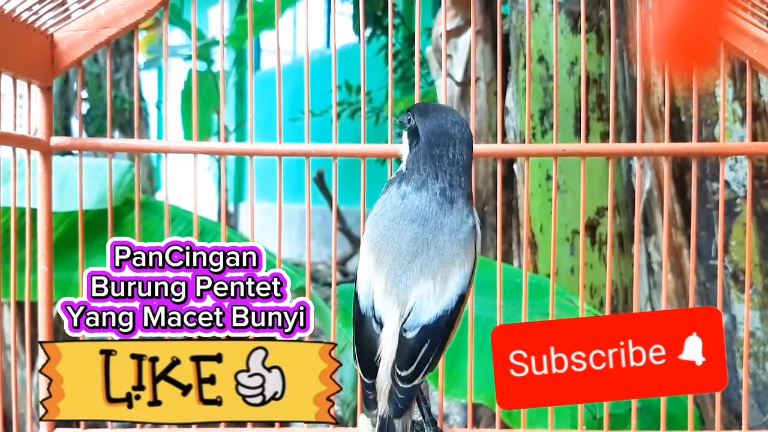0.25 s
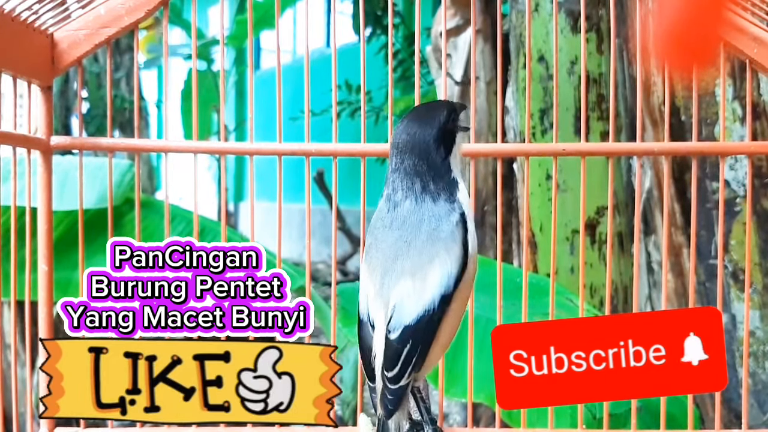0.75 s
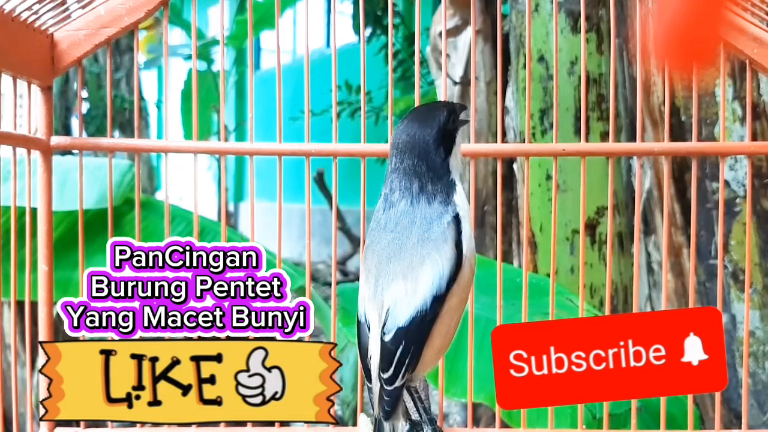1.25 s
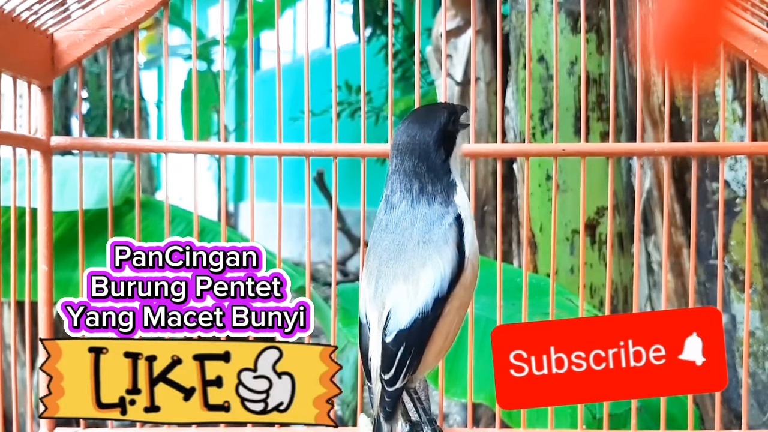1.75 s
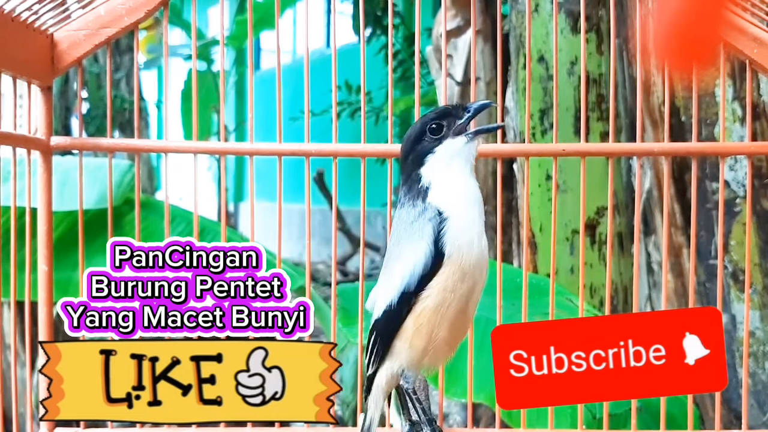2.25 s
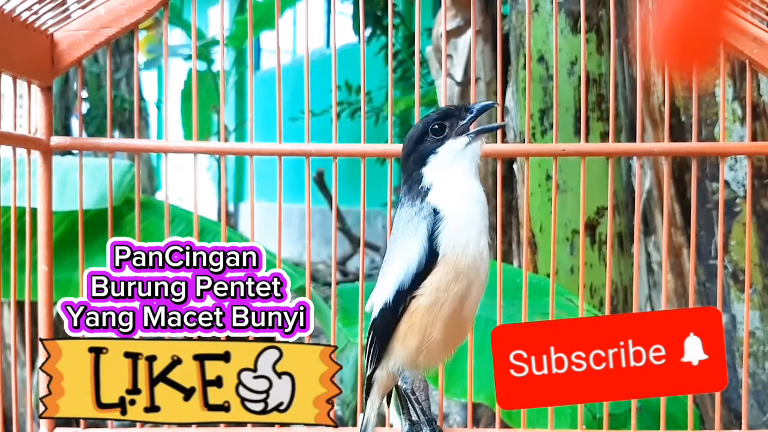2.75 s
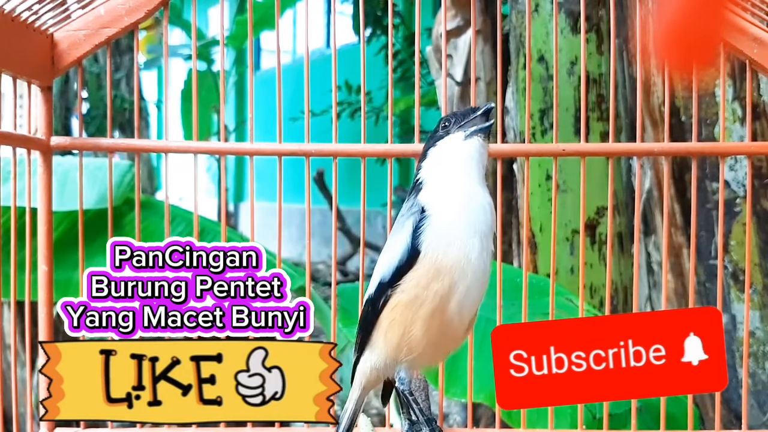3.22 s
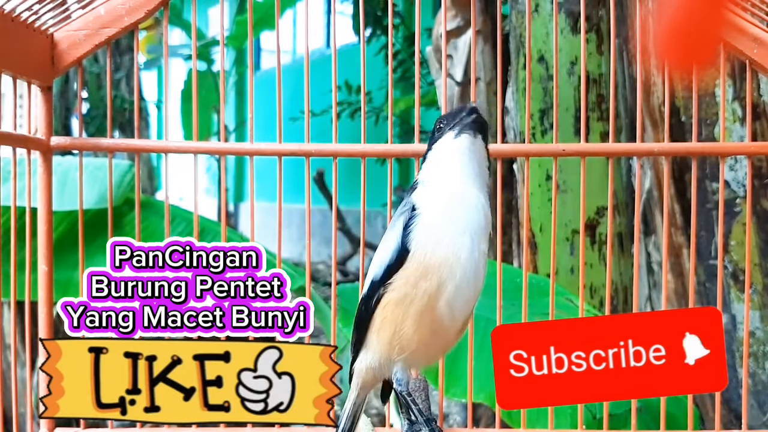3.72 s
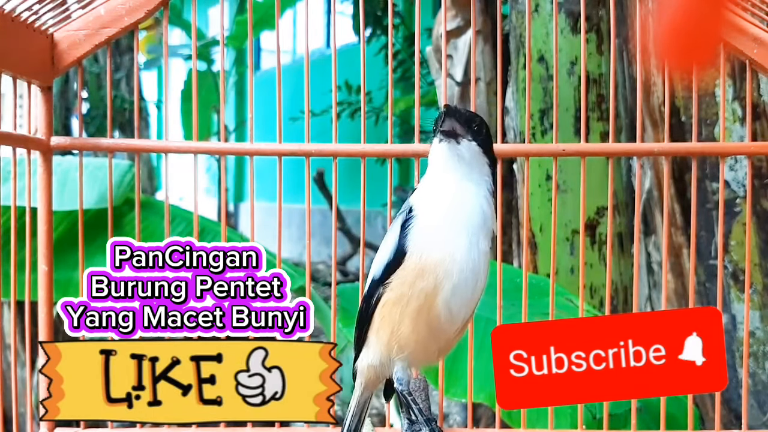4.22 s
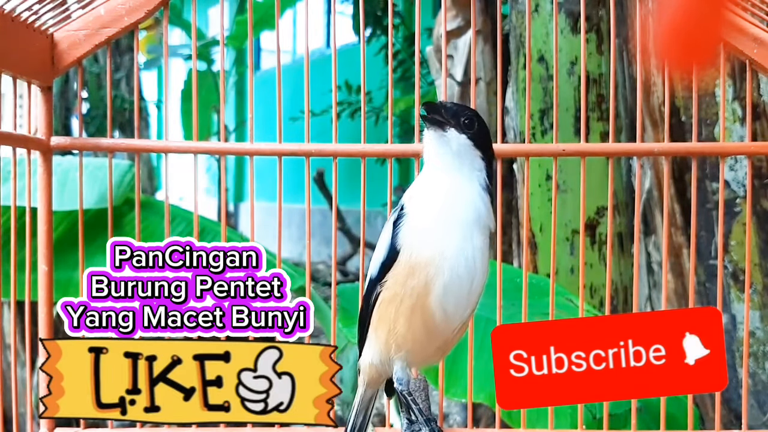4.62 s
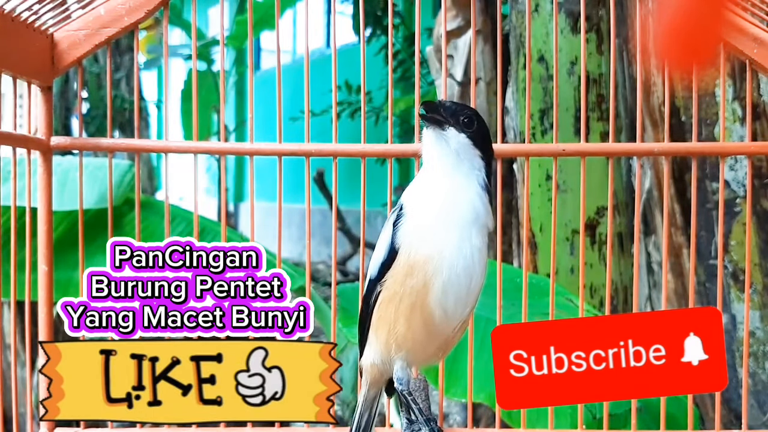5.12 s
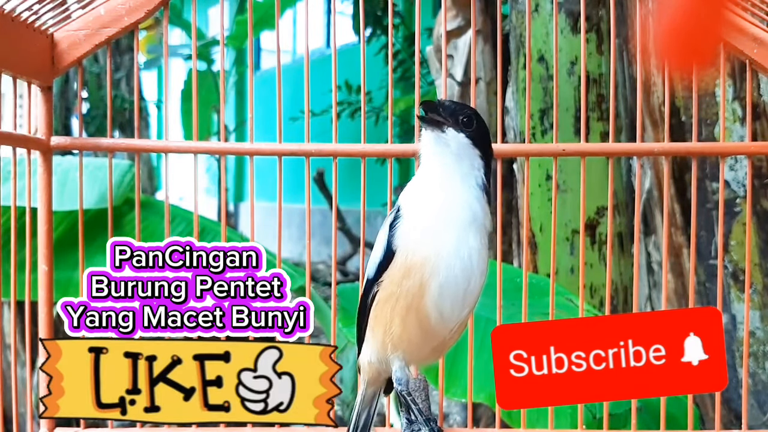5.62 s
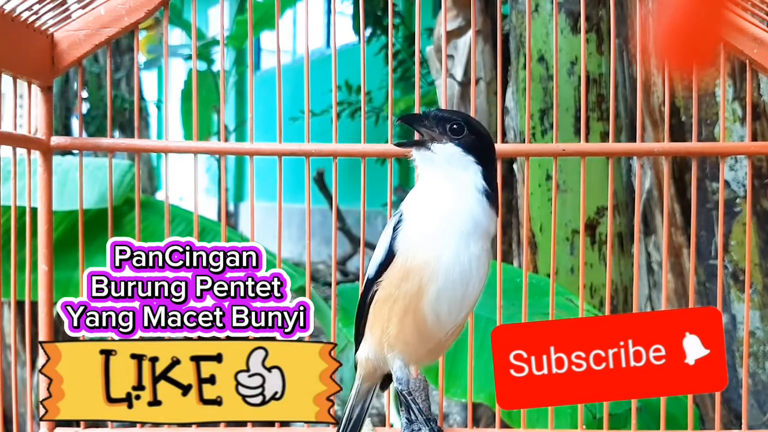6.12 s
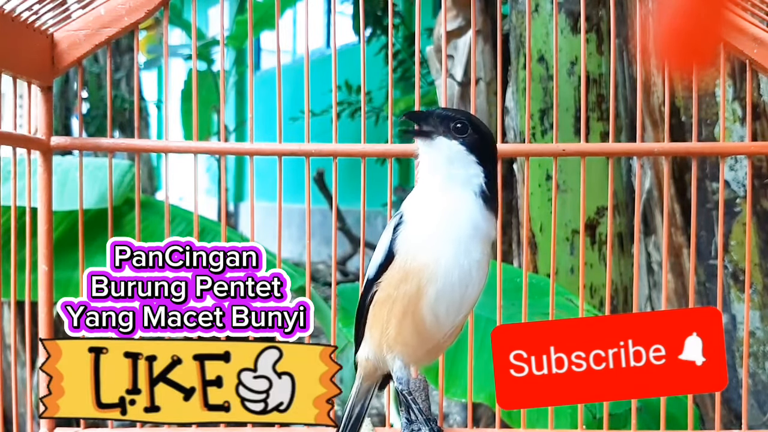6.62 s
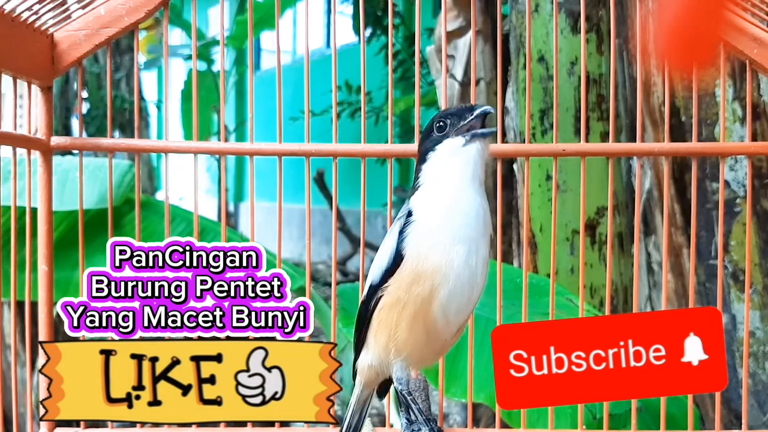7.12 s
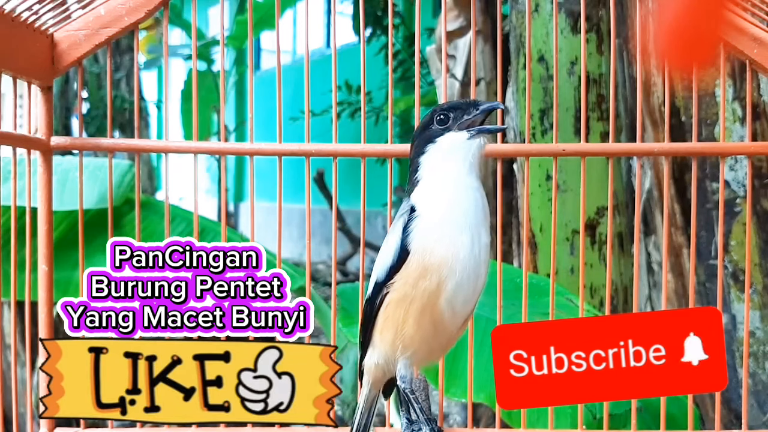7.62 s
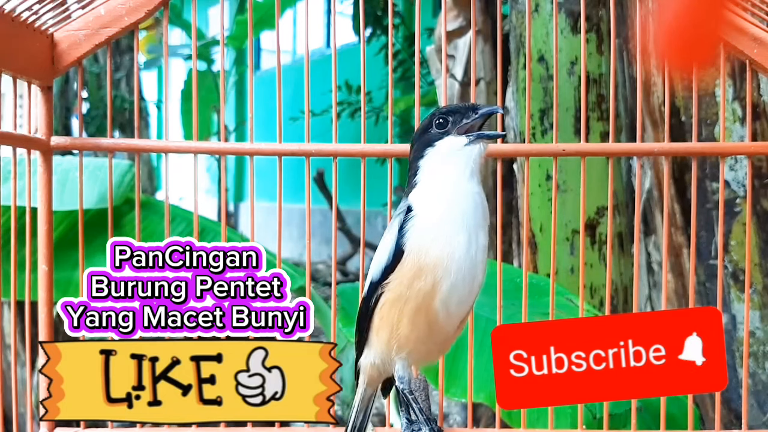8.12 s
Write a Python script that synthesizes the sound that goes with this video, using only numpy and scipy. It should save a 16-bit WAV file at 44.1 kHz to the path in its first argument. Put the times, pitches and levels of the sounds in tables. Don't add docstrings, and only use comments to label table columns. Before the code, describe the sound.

A caged songbird sings loudly up close: rolling falling slurs, rapid clicking ticks, three harsh rasping scolds, then more ticks, slurs and a final scold.

```python
import sys
import numpy as np
from scipy import signal
from scipy.fft import rfft, irfft, next_fast_len
from scipy.io import wavfile
from scipy.ndimage import uniform_filter1d

SR = 44100
rng = np.random.default_rng(int(sys.argv[2]) if len(sys.argv) > 2 else 0)


def rack_gain(trim_db):
    fader = np.asarray(trim_db, float)
    return 10 ** (fader / 20)


def int16_out(signal):
    q = np.round(np.clip(np.atleast_2d(signal).T, -1, 1) * 32767)
    wavfile.write(sys.argv[1], SR, q.astype(np.int16))


N = 368235


def unit(x):
    return x / np.sqrt(np.mean(np.abs(x) ** 2) + 1e-20)


def along(points, hz):
    f, v = np.transpose(points)
    return np.interp(np.log(hz + 1), np.log(f + 1), v)


def filtered(x, response):
    m = next_fast_len(N + 8192)
    return irfft(rfft(x, m) * response(np.fft.rfftfreq(m, 1 / SR)), m)[..., :N]


def random_walk(points_per_s):
    count = int(N / SR * points_per_s) + 2
    return np.interp(np.arange(N) / SR * points_per_s, np.arange(count), rng.standard_normal(count))


def flutter(width_hz, skirt_db=-60):
    def shape(hz):
        return 1 / (1 + (hz / width_hz) ** 2) + rack_gain(skirt_db) / (1 + (hz / 1200) ** 4)
    re, im = filtered(rng.standard_normal((2, N)), shape)
    return unit(re + 1j * im)


# freq_hz [Hz], level_db [dB per Hz]
MURMUR_TONE = [(24, -60), (40, -12.5), (75, 3), (434, -10.5), (1050, 0), (1280, -9), (1540, -6),
               (3000, -17.5), (3900, -55.5), (6600, -120)]
# time_s [s], level_db [dB]
MURMUR_LEVEL = [(0, -70), (3.9, -73.5), (4.3, -76.5), (4.7, -77), (5.1, -94), (5.4, -84), (8.35, -73.5)]


def murmur():
    s, db = np.transpose(MURMUR_LEVEL)
    noise = filtered(rng.standard_normal((2, N)), lambda f: rack_gain(along(MURMUR_TONE, f)))
    return rack_gain(np.interp(np.arange(N) / SR, s, db)) * unit(noise)


# start_s [s], end_s [s], pitch_hz [Hz]
WHINES = [
    (.1, 2.2, 15676),
    (2.45, 3.85, 14642),
    (5.85, 6.3, 15676),
    (6.45, 8.2, 15676),
]


def whine(power):
    t = np.arange(N) / SR
    key = rack_gain(-17) * np.abs(uniform_filter1d(np.pad(power, (150, 0))[:N], 600))
    key *= np.clip(random_walk(12) + .2, 0, 2)
    return key * sum(((t > start) & (t < end)) * np.sin(2 * np.pi * hz * t) for start, end, hz in WHINES)


# freq_hz [Hz], decay_s [s to fall by 60 dB]
PORCH_DECAY = [(1500, 0.29), (4000, 0.28), (8000, 0.26), (15000, 0.44)]


def porch(x):
    hz, t, z = signal.stft(rng.standard_normal((2, SR // 2)), SR, nperseg=256)
    tail = signal.istft(z * rack_gain(-60 * t / along(PORCH_DECAY, hz)[:, None]), SR, nperseg=256)[1]
    tail /= np.linalg.norm(tail[0])
    late = signal.fftconvolve(np.pad(x, (200, 0))[None], tail, axes=1)[:, :N]
    near = rng.standard_normal((4, 2, 900)) * rack_gain(-60 * np.arange(900) / SR / .04)
    near /= np.linalg.norm(near, axis=2, keepdims=True)
    pose = (np.arange(N) * 9 // SR) % 4 == np.arange(4)[:, None]
    facing = uniform_filter1d(pose * 1., size=900, axis=1)
    turned = np.pad(x * facing, ((0, 0), (40, 0)))[:, None]
    early = signal.oaconvolve(turned, near, axes=2).sum(0)[:, :N]
    return rack_gain(-11) * late + early / 3.5


# freq_hz [Hz], level_db [dB]
THUMP_TONE = [(20, -29.5), (60, -22), (200, -20.5), (600, -19.5), (1500, -21.5), (2500, -28), (6000, -29.5),
              (9000, -5), (12000, -2)]


def overload(dry):
    top, hard = .5, 3
    clipped = dry / (1 + np.abs(dry / top) ** hard) ** (1 / hard)
    rattle = 1 + 1.57 * rng.standard_normal(dry.shape)
    return clipped + filtered(rattle * dry ** 2, lambda f: rack_gain(along(THUMP_TONE, f)))


def gate(x, power):
    level_db = 10 * np.log10(np.abs(uniform_filter1d(power, 1300)) + 1e-12)
    return x * rack_gain(np.clip(1.6 * (level_db + 56), -35, 0))


# freq_hz [Hz], level_db [dB]
KEPT_SOUND = [(1500, -2.5), (6000, -0.5), (7000, 0.5), (9000, -12.5), (15500, -12.5), (16200, -71)]
# freq_hz [Hz], level_db [dB]
REBUILT_TOP = [(6800, -55), (7600, -39.5), (9000, -5), (10500, -17), (12500, -25), (14000, -19),
               (15900, -26.5), (16200, -83.5)]
# freq_hz [Hz], extra_db [dB]
DROP_SOONER = [(4600, 0), (5100, 12), (6000, 7), (7500, 9), (8000, 0), (9200, 0), (10000, 6), (16000, 6)]


def phone(x):
    hz, t, z = signal.stft(x, SR, nperseg=512)
    outline = np.sqrt(np.abs(uniform_filter1d(np.abs(z) ** 2, size=10, axis=1)))
    copy = .4 * z + outline * np.exp(2j * np.pi * rng.random(z.shape))
    shifted = np.roll(copy, 88, 1)
    z = z * rack_gain(along(KEPT_SOUND, hz))[:, None] + shifted * rack_gain(along(REBUILT_TOP, hz))[:, None]
    band, block = np.arange(len(hz)) // 8, np.arange(len(t)) // 6
    power = uniform_filter1d(np.mean(np.abs(z) ** 2, 0), size=8, axis=0)
    power = uniform_filter1d(power, size=6, axis=1)
    cell_db = 10 * np.log10(np.abs(power[4::8, 3::6]) + 1e-16)
    cell_hz = hz[4::8, None]
    above_peak_limit = cell_db - cell_db.max(0) + 36
    above_floor = cell_db + 88 + 8 * (cell_hz < 4600) - 11 * (cell_hz > 9600)
    spare_db = np.minimum(above_peak_limit, above_floor) - along(DROP_SOONER, cell_hz)
    luck_db = 5 * rng.standard_normal(cell_db.shape)
    keep = rack_gain(np.clip(3 * (spare_db + luck_db), -30, 0))
    keep = keep[np.minimum(band, len(keep) - 1)][:, np.minimum(block, keep.shape[1] - 1)]
    return signal.istft(z * keep, SR, nperseg=512)[1][:, :N]


# start_s [s], pitch_hz at the start [Hz], level_db [dB]
TICKS_1 = [(2.1708, 5830, -31), (2.2224, 6160, -20.5), (2.295, 5665, -21), (2.3632, 5500, -18.5),
           (2.424, 5365, -19), (2.4951, 4801, -19), (2.5604, 4631, -17), (2.6287, 4150, -16),
           (2.696, 3353, -15), (2.7625, 3598, -14), (2.831, 3093, -16), (2.901, 3095, -17),
           (2.969, 3491, -14), (3.0361, 3035, -14.5), (3.1005, 3480, -13.5), (3.1692, 2967, -15.5),
           (3.2355, 2970, -15), (3.305, 3188, -15), (3.369, 3662, -12.5), (3.4371, 2910, -17),
           (3.506, 2879, -19), (3.5792, 3028, -18), (3.6481, 2897, -16), (3.7254, 3036, -17),
           (3.8115, 2992, -16)]
TICKS_2 = [(5.8121, 4050, -34), (5.8836, 3893, -23.5), (5.9517, 3966, -19.5), (6.0152, 4002, -20),
           (6.0815, 3995, -20.5), (6.148, 4130, -20.5), (6.2133, 3572, -21), (6.283, 3453, -22)]
TICKS_3 = [(7.7803, 5638, -26), (7.847, 5597, -24.5), (7.915, 5294, -21.5), (7.9807, 4858, -17.5),
           (8.053, 4473, -17), (8.1272, 4070, -15)]
TICK_LENGTHS = (.0122, 0.0076, .009)


def ticks():
    return [(s, length, hz, 4960 + .5 * max(hz - 3921, 0), db)
            for run, length in zip([TICKS_1, TICKS_2, TICKS_3], TICK_LENGTHS) for s, hz, db in run]


# freq_hz [Hz], level_db [dB]
SNAP_TONE = [(30, -5), (200, 6.5), (700, -6.5), (2000, -11), (3500, -56), (6500, -16.5), (8500, 14.5),
             (11000, -1.5), (15500, 8), (16500, -39)]


def snaps():
    s, length, _, _, db = np.transpose(ticks())
    moments = np.round((s + 0.24 * length) * SR).astype(int)
    blows = np.bincount(moments, rack_gain(db + 0.5 - 6.4 * (s > 7)), N)[:N]
    shape = np.convolve(blows, np.hanning(int(0.0075 * SR)))[:N]
    mid, side = rng.standard_normal((2, N))
    noise = mid + 0.46 * side * np.array([[1], [-1]])
    return filtered(shape * noise, lambda f: rack_gain(along(SNAP_TONE, f) - 5))




def tick(s, length, start_hz, end_hz, db):
    depth = np.clip(start_hz / 1000 - 3, 0, 2)
    octave_db = db - 1.5 - 14 * depth
    breath_db = db - 10 - 9 * depth
    return [(s - .0008, .94 * start_hz, db - 26, octave_db - 12, -80, breath_db - 28, .15),
            (s + 0.14 * length, start_hz, db + 1, octave_db, -60, breath_db + 2, .4),
            (s + .52 * length, .98 * end_hz, db + 6.0, db - 47, -60, breath_db + 6.5, .4),
            (s + .9 * length, end_hz, db - 3.5, db - 40.5, -60, breath_db - 7.5, .25),
            (s + length + 0.005, end_hz, db - 59.5, -80, -80, breath_db - 40, .15)]


# freq_hz [Hz], level_db [dB]
THROAT_TONE = [(1700, -25.5), (2400, -23.5), (3000, -6), (4500, -3), (6000, 5), (6900, -22.5), (9000, -44)]


def harsh(shape, s=0, stretch=1, db=0):
    note = []
    for u, hz, effort, rough, first_db in shape:
        drive = effort + db
        partials = [drive + along(THROAT_TONE, k * hz) + (k == 1) * first_db for k in (1, 2, 3)]
        breath_db = drive + max(first_db - 7, 0) - 16.5 + 23.5 * rough
        note.append((s + stretch * u, hz, *partials, breath_db, rough))
    return note


# start_s [s], stretch [times], level_db [dB]
SCOLD_TIMES = [
    (4.365, 0.98, 3),
    (4.883, 0.93, 1),
    (5.463, 0.96, 1.5),
]
# time_s from its start [s], pitch_hz [Hz], effort_db [dB], roughness [0-1], first_partial_db [dB]
SCOLD_SHAPE = [
    (-.012, 1681, -88.5, 0, 11),
    (0, 1842, -42.5, 0.19, 18),
    (.014, 2056, -24.5, 0.24, 6.5),
    (.03, 2276, -15, 0.32, 2.5),
    (.088, 2365, -14, 0.51, -1),
    (.094, 2742, -25.5, 1.14, 8),
    (.14, 2000, -21, 1.05, 8.5),
    (.182, 2500, -16, .8, -14.5),
    (.192, 2559, -27.5, .4, 5.5),
]
# time_s [s], pitch_hz [Hz], effort_db [dB], roughness [0-1], first_partial_db [dB]
LAST_SCOLD = [
    (8.196, 1700, -64, 0.31, 0),
    (8.203, 2100, -18, 0.17, -10),
    (8.21, 2363, -17.5, 0.32, -28),
    (8.25, 2511, -10.5, .35, -2),
    (8.282, 2530, -13, .6, -4.5),
    (8.288, 2800, -27, 1.2, 10.5),
    (8.31, 2000, -18.5, .95, 9),
    (8.352, 2400, -11, .75, -12),
]


def scolds():
    return [harsh(LAST_SCOLD)] + [harsh(SCOLD_SHAPE, *row) for row in SCOLD_TIMES]


# time_s [s], pitch_hz [Hz], effort_db [dB], roughness [0-1], first_partial_db [dB]
BREAKING_SLUR = [
    (3.892, 4480, -93.5, .17, 25),
    (3.901, 4360, -41.5, 0.22, 35.5),
    (3.92, 3008, -43, 0.77, 30),
    (3.927, 2470, -15.5, 0.31, 13),
    (3.972, 2444, -15, 0.53, 6.5),
    (3.976, 3079, -19, 0.17, -37.5),
    (4.0, 3180, -17.5, 0.28, -33),
    (4.008, 3200, -44, .2, -18),
]


def breaking_slur():
    return [(*row, row[3] - 9) for row in harsh(BREAKING_SLUR)]


def slur(s, length, start_hz, held_hz, slur_db, held_db):
    low = held_hz / 2
    rasp = .68
    bend, shift = np.clip(rng.standard_normal(2), -1.5, 1.5) * [.06, .0025]
    turn_s = s + min(.04 + 2 * shift, length - .006)
    return [(s - .004, 1.1 * start_hz, slur_db - 28, slur_db - 67, -80, slur_db - 34, rasp / 2),
            (s + .003, start_hz, slur_db - 6.5, slur_db - 42.5, -60, slur_db - 21.5, 0.744 * rasp),
            (s + .008 + shift, (0.6 + bend) * start_hz + .45 * low,
             slur_db - 5, slur_db - 56.0, -55, slur_db - 18.5, rasp),
            (s + .014 + shift, (0.5 + bend) * start_hz + .55 * low,
             slur_db - 9, slur_db - 46.5, -55, slur_db - 13.5, rasp),
            (s + .021, 1.1 * low, slur_db - 13, held_db - 19, -50, held_db - 19, rasp),
            (s + .028, .985 * low, slur_db - 18, held_db + 1, held_db - 22, held_db - 11, rasp),
            (turn_s, low, held_db - 15.5, held_db + 2, held_db - 21.5, held_db - 13.5, rasp),
            (s + max(length - .004, .034), 1.04 * low,
             held_db - 17.5, held_db, held_db - 27.0, held_db - 13.5, rasp),
            (s + max(length, .038) + 0.0038, low, held_db - 37.5, held_db - 22, -80, held_db - 26, rasp)]


# start_s [s], pitch_hz at the start [Hz], slur_db [dB], held_db [dB]
SLURS_1 = [(0.035, 4710, -13, -23.5), (0.127, 4300, -9.5, -18), (0.226, 4185, -8, -16.5),
           (0.3352, 3893, -10, -16), (0.4425, 3644, -10, -18.5), (0.561, 3620, -11, -16),
           (0.6662, 3426, -12.5, -15.5), (0.7721, 3498, -11, -15), (0.8785, 3540, -8, -16.5),
           (0.9812, 3743, -12, -17), (1.0857, 3364, -11.5, -19), (1.1908, 3256, -14, -19),
           (1.306, 3730, -12, -20), (1.4123, 3420, -12, -23), (1.5216, 3736, -12.5, -22),
           (1.6295, 3383, -14, -19), (1.738, 3288, -12.5, -21), (1.8528, 3360, -12, -17),
           (1.961, 3810, -12, -13), (2.0775, 3816, -11, -14)]
SLURS_2 = [(6.363, 4298, -5, -23), (6.459, 4127, -6, -20), (6.5647, 4019, -8, -15), (6.673, 3607, -8, -15),
           (6.7894, 3570, -6.5, -12), (6.8972, 3758, -10, -13), (7.0104, 3643, -6, -13.5),
           (7.1172, 3497, -9.5, -15.5), (7.2257, 3709, -7.5, -16), (7.3271, 3422, -8.5, -12),
           (7.439, 3253, -6.5, -12.5), (7.554, 3541, -8.5, -12.5), (7.6633, 3618, -9.5, -13)]
# time_s [s], pitch_hz [Hz]
HELD_PITCH = [(.03, 5230), (.34, 5073), (.67, 4659), (1.0, 4309), (1.3, 3951), (1.85, 4066), (2.08, 4385),
              (6.36, 5460), (6.6, 4960), (6.8, 4897), (7.1, 4571), (7.5, 4437), (7.67, 4690)]


def slurs():
    notes = []
    for run, first_s in [(SLURS_1, .038), (SLURS_2, .042)]:
        for k, (s, hz, slur_db, held_db) in enumerate(run):
            length = .057 if k else first_s
            held_hz = np.interp(s, *np.transpose(HELD_PITCH))
            points = slur(s, length, hz, held_hz, slur_db, held_db)
            notes.append([(*p[:5], p[5] - 16, p[6], p[5] - .8) for p in points])
    return notes


# freq_hz [Hz], level_db [dB per Hz]
BREATH_TONE = [(59, -25.5), (100, -13.5), (2120, -21), (2800, -4), (4120, 4.5), (4680, -0.5), (6050, 1.5),
               (6870, -12), (8510, 4), (15100, -7.5), (16500, -56)]


def song():
    off = -120

    def hush(p, shift):
        return (p[0] + shift, p[1], off, off, off, off, p[6], off)

    plain = [tick(*row) for row in ticks()] + scolds()
    notes = [[(*p, off) for p in note] for note in plain] + [breaking_slur()] + slurs()
    points = sorted(p for note in notes for p in [hush(note[0], -0.0022), *note, hush(note[-1], 0.0022)])
    s, *cols = np.transpose(points)
    t = np.arange(N) / SR
    hz, *partial_db, breath_db, rough, rasp_db = [np.interp(t, s, c) for c in cols]
    rough = np.clip(rough, 0, 1)
    phase = 2 * np.pi * np.cumsum(hz * (1 + .045 * rough * random_walk(250))) / SR

    breath = unit(filtered(rng.standard_normal(N), lambda f: rack_gain(along(BREATH_TONE, f))))
    voice = rack_gain(breath_db) * breath
    rasp_phase = 1.4 * np.cumsum(np.minimum(hz, 2500)) * 2 * np.pi / SR
    voice += np.sqrt(2) * rack_gain(rasp_db) * (flutter(400) * np.exp(1j * rasp_phase)).real
    halfway_db = rasp_db - 4.0 + 5 * random_walk(30) - np.clip(hz - 2700, 0, 600) / 15
    voice += np.sqrt(2) * rack_gain(halfway_db) * np.cos(3 * phase / 2)
    for k, db in enumerate(partial_db):
        size = np.sqrt(1 - rough ** 2) + rough * flutter(173, skirt_db=-68)
        voice += np.sqrt(2) * rack_gain(db) * (size * np.exp(1j * (k + 1) * phase)).real
    return voice


# freq_hz [Hz], lead_rad [radians]
LEFT_LEAD = [(2500, 0.6), (3270, 0.24), (4480, 1.69), (5430, 1.94), (7580, 1.6), (9000, 0.63),
             (16000, 2.36)]


def scene():
    bird, snap = song(), snaps()
    sides = np.array([[1], [-1]])
    direct = filtered(bird, lambda f: np.exp(.5j * along(LEFT_LEAD, f) * sides))
    bright_snap = filtered(snap[0], lambda f: rack_gain(-1.5) * (f > 7400))
    return rack_gain(2.42) * direct + porch(bird + bright_snap) + snap


def top_cut(x):
    return signal.sosfilt(signal.butter(12, 17000, fs=SR, output="sos"), x)


def record(dry):
    bent = overload(dry)
    power = np.mean(bent ** 2, 0)
    bird = phone(np.tanh(gate(bent, power)))
    return top_cut(bird + whine(power) + murmur())


dry = scene()
out = record(dry)
int16_out(out)
```